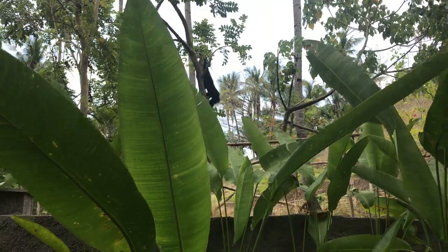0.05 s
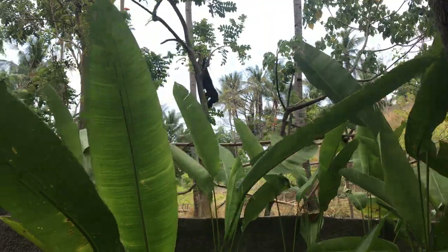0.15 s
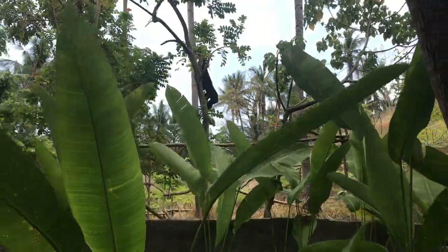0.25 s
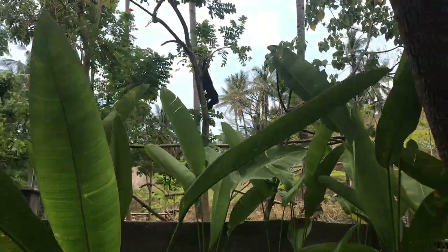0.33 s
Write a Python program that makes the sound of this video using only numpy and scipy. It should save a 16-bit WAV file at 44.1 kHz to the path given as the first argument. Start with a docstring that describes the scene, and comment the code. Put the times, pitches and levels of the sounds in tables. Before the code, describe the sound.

Two gibbons call loudly among trees: one holds a high wavering note while another sweeps upward, then eleven short whoops follow, growing longer and slower, with bright scattered echo off foliage over very quiet outdoor air.

```python
"""In a leafy park two gibbons call. One holds a high clear note while the other glides up through it;
then the note breaks into short arched whoops that grow longer and slower. The voices are sums of harmonics.
Trunks and foliage, as filtered decaying noise, scatter the calls into a bright wash.
Behind them lie very quiet outdoor air, a faint low hum and soft bumps at the microphone, all of shaped noise."""
import sys
import numpy as np
from scipy import signal
from scipy.fft import rfft, irfft
from scipy.io import wavfile
from scipy.ndimage import uniform_filter1d

SR = 44100
rng = np.random.default_rng(int(sys.argv[2]) if len(sys.argv) > 2 else 0)


def master(y):
    """Save y as 16-bit WAV."""
    cut = np.clip(np.atleast_2d(y).T, -1, 1)
    pcm = np.round(cut * 32767)  # scale
    wavfile.write(sys.argv[1], SR, pcm.astype(np.int16))


N = 132300
T = np.arange(N) / SR  # s
ATTACK_S, RELEASE_S = 0.009, 0.02  # onset and ending of a call


def undb(db):
    """Decibels to gain."""
    return 10 ** (np.asarray(db) / 20)


def curve(table, column=1):
    """One column of a time table at every sample."""
    table = np.array(table)
    return np.interp(T, table[:, 0], table[:, column])


def response(table, hz):
    """Gain of a (Hz, dB) table at given frequencies, read along log frequency."""
    f, db = np.array(table).T
    return undb(np.interp(np.log(np.maximum(hz, 1)), np.log(f), db))


def coloured(x, colour):
    """A sound filtered by a (Hz, dB) table."""
    hz = np.arange(N // 2 + 1) * SR / N
    return irfft(rfft(x) * response(colour, hz), N)


def noise(colour):
    """Coloured noise of rms 1."""
    x = coloured(rng.standard_normal(N), colour)
    return x / x.std()


def wobble(rate):
    """Smooth chance with a spread of 1, averaged twice over 1 / rate seconds."""
    k = max(int(SR / rate), 1)
    x = uniform_filter1d(uniform_filter1d(rng.standard_normal(N), k), k)
    return x / x.std()


def gate(t, start, end, attack, release):
    """Smooth rise after the start and smooth fall centred on the end."""
    rise = np.sin(np.pi / 2 * np.clip((t - start) / attack, 0, 1))
    fall = np.sin(np.pi / 2 * np.clip((end - t) / release + 0.5, 0, 1)) ** 2
    return rise * fall


def turn(hz):
    """Phase of the vocal folds."""
    return 2 * np.pi * np.cumsum(hz) / SR


def partial(phase, k):
    """One sine of rms 1 at k times the voice's pitch."""
    return np.sqrt(2) * np.sin(k * phase)


def outdoor_air():
    """Quiet outdoor air as shaped noise whose level drifts a little."""
    # Each row: frequency in Hz, relative level in dB.
    air_colour = [(20, -26), (60, 4.5), (130, 1.5), (250, 0.5), (315, -3), (400, -12), (700, -13),
                  (1500, 2.5), (3000, -10.5), (7000, -12), (15000, -24)]
    level_db = -57.5 + 0.79 * wobble(10.4)
    return undb(level_db) * noise(air_colour)


def low_hum():
    """A faint low hum under the held note: a narrow band of noise that fades away."""
    # Each row: time in seconds, level in dB.
    hum_level = [(.1, -54.5), (.5, -63), (.85, -65), (1.1, -67)]
    # Each row: frequency in Hz, relative level in dB.
    hum_colour = [(150, -71), (260, -19), (300, 4), (335, 5), (400, -36), (700, -65)]
    return undb(curve(hum_level)) * noise(hum_colour)


def held_note(count=18):
    """A clear, almost level note falters and ends in a short swelling fall; returns low and high harmonics."""
    # The held pitch. Each row: time in seconds, pitch in Hz.
    hold_pitch = [(.09, 857), (.155, 863), (.18, 853.2), (.23, 854.4), (.31, 867.6), (.37, 852),
                  (.45, 879.5), (.5, 853), (.54, 845.3), (.6, 859.3), (.635, 829), (.67, 864.5),
                  (.695, 838.3), (.725, 803), (.752, 821), (.778, 835), (.802, 715)]
    # The lowest harmonics fade in and out. Each row: time in seconds, first, second and third harmonic in dB.
    hold_level = [(.09, -30.5, -29, -36.5), (.2, -21, -24.5, -28.5), (.235, -25, -28, -72),
                  (.26, -28, -42, -48), (.285, -28, -26.5, -29), (.38, -27.5, -28.5, -53),
                  (.43, -29.5, -48, -62), (.475, -28, -24, -30), (.52, -22.5, -22, -77),
                  (.545, -25, -33, -38), (.595, -22, -25, -25.5), (.628, -36.5, -28, -54),
                  (.66, -25.5, -21.5, -30.5), (.695, -27, -24, -35), (.712, -34.5, -36, -36),
                  (.74, -35, -33.5, -44.5), (.776, -21.5, -19, -34.5), (.8, -27, -23.5, -34)]
    # The upper harmonics. Each row: frequency in Hz, level in dB.
    hold_treble = [(3430, -62.5), (4300, -50), (5150, -53.5), (6000, -55), (6900, -59.5), (7750, -65.5),
                   (8600, -60.5), (10300, -72.5), (12900, -68), (15500, -76)]
    hz = curve(hold_pitch) * (1 + 0.0031 * wobble(200))  # slight pitch jitter
    phase = turn(hz)
    low = sum(undb(curve(hold_level, k)) * partial(phase, k) for k in range(1, 4))
    high = sum(response(hold_treble, k * hz) * partial(phase, k) for k in range(4, count + 1))
    low_gate = gate(T, 0, hold_pitch[-1][0], ATTACK_S, RELEASE_S)
    high_gate = gate(T, 0, 0.839, ATTACK_S, 0.016)  # the treble ends slightly later
    return low * low_gate, high * high_gate


def foliage(x):
    """Uneven scatter from near trees, then a soft echo and faint tail from far ones; treble dies sooner."""
    # Strength of the scattered sound. Each row: frequency in Hz, level in dB.
    scatter_colour = [(300, -21), (620, -10), (800, -8.5), (1200, -1), (1600, -3.5), (2400, -3),
                      (3500, 7.5), (8000, 6.5), (15000, 8.5)]
    BUILD_S, GRAIN = 0.0091, 0.68  # build-up of the scatter; unevenness of the reflections
    NEAR_T60_S, FAR_T60_S, FAR_DB = 0.38, 2.05, -21  # 60 dB decay times in the limit of low pitch
    ECHO_S, ECHO_WIDTH_S, ECHO_DB = 0.316, 0.062, -30.5  # a far line of trees, before the air dulls it
    AIR_HZ = 15100  # scale of the treble loss
    reflections = rng.standard_normal(N) * np.exp(GRAIN * rng.standard_normal(N))
    spectrum = rfft(coloured(reflections / reflections.std(), scatter_colour))
    hz = np.arange(N // 2 + 1) * SR / N
    centres = np.geomspace(250, 16000, 7)  # overlapping bands, each with its own decay
    response_to_click = 0
    for centre, pick in zip(centres, np.eye(len(centres))):
        band = irfft(spectrum * np.interp(hz, centres, pick), N)
        fade = np.log(1000) * T * (1 + centre / AIR_HZ / 2)
        near = np.exp(-fade / NEAR_T60_S)
        tail = undb(FAR_DB) * np.exp(-fade / FAR_T60_S)
        echo = undb(ECHO_DB) * np.exp(-((T - ECHO_S) / ECHO_WIDTH_S) ** 2 - 2 * centre / AIR_HZ)
        shape = (1 - np.exp(-(T / BUILD_S) ** 2)) * (near + tail + echo)
        response_to_click = response_to_click + band * shape / np.sqrt(np.sum(shape ** 2))
    return signal.fftconvolve(x, response_to_click)[:N]


def glide(count=4):
    """A nearly pure tone rises, almost levels off, then sweeps up steeply; it brightens as it gets louder."""
    # The upward path. Each row: time in seconds, guide pitch in Hz, level in dB.
    glide_path = [(.125, 575.7, -45), (.15, 646, -38), (.185, 687, -32.5), (.3, 719, -29),
                  (.358, 764.7, -30), (.405, 856, -22.5), (.458, 946, -25), (.505, 1018, -18.5),
                  (.532, 1210, -21), (.552, 1544, -28)]
    # Each row: harmonic number, level in dB at the loudest moment.
    glide_harmonics = [(1, 0), (2, -13.5), (3, -26), (4, -35)]
    BRIGHTEN = 0.98  # overtones gain this many dB more per dB of level
    phase = turn(curve(glide_path) * (1 + 0.0057 * wobble(200)))  # slight pitch jitter
    db = curve(glide_path, 2)
    overtones = sum(response(glide_harmonics, k) * partial(phase, k) for k in range(2, count + 1))
    fundamental = partial(phase, 0.99)  # 1 % below the guide pitch
    voice = fundamental + undb(BRIGHTEN * (db - db.max())) * overtones
    return voice * undb(db) * gate(T, glide_path[0][0], glide_path[-1][0], 0.024, 0.019)


def whoops(count=24):
    """Whoops arch in pitch, swell and collapse, with rough overtones; returns straight and tree-bound sound."""
    # Each row: start in seconds, length in seconds, time to the top in seconds, top guide pitch in Hz,
    # time from the top to half the fall in seconds, level in dB,
    # then gain of the second and of the upper harmonics on the straight path, both in dB.
    whoop_list = [(0.845, 0.067, 0.019, 799.6, .05, -16.5, 5.5, 2.5),
                  (0.988, 0.065, 0.023, 775, .045, -14.5, 7.5, 4),
                  (1.134, .07, 0.019, 773, .045, -13.5, 2.5, 2), (1.3, 0.085, 0.02, 787, 0.05, -13, 0.5, 0),
                  (1.465, 0.089, .025, 773.3, 0.049, -12.5, -4.5, -5),
                  (1.632, 0.091, .023, 782.4, 0.049, -12, -5, -5),
                  (1.812, 0.091, 0.024, 792, .044, -11.5, -7, -10.5),
                  (1.999, 0.1, .027, 777.6, 0.05, -13, -1, -8),
                  (2.197, 0.1, 0.028, 777.3, 0.05, -13, 0.5, -2.5),
                  (2.399, 0.099, .021, 787, 0.046, -12.5, 0, -3.5),
                  (2.602, 0.11, 0.025, 793.5, 0.046, -11.5, -3, -2.5)]
    # The fundamental's strength by guide pitch. Each row: frequency in Hz, level in dB.
    chest_colour = [(310, -24.5), (390, -20), (450, -20), (540, -7), (620, 0.5), (700, -3), (790, -4)]
    # Strength of the overtones. Each row: frequency in Hz, level in dB.
    throat_colour = [(700, -118), (1000, -24), (1250, -9.5), (1480, -9), (1600, -6), (1800, -22.5),
                     (2350, -18), (2650, -24.5), (3100, -24), (3500, -32.5), (3900, -30.5), (5200, -46.5),
                     (7000, -41.5), (10500, -54), (15000, -58)]
    LOW_HZ, CROAK_HZ = 378.5, 324  # foot of the arch and lowest guide pitch
    DROP_S, DROP_EARLY_S, CROAK_S = 0.04, 0.0029, 0.03  # the pitch collapses into a brief faint croak
    SWELL_S, SWELL_DB, OVERTONE_SWELL_DB = 0.018, -14, -5.5  # each whoop starts weaker
    RUN_OUT_S, RUN_OUT_DB = 0.0132, -11.5  # the voice weakens over its last moments
    JITTER, RASP, DULLING_DB = 0.004, 0.22, -7  # the upper harmonics fade as the voice falls
    TREE_OVERTONE_DB, BRIGHT_SHARE = -0.5, 0.24  # the trees get only a share of the extra brightness
    straight, around = np.zeros(N), np.zeros(N)
    jitter, flutter = wobble(530), wobble(900)
    for start, length, top_s, top_hz, fall_s, db, second_db, upper_db in whoop_list:
        span = (T >= start) & (T < start + length + CROAK_S + RELEASE_S)
        t = T[span] - start
        falling = np.clip((t - top_s) / fall_s, 0, 1)
        arch = LOW_HZ + (top_hz - LOW_HZ) / (1 + ((t - top_s) / fall_s) ** 2)
        collapse = np.exp(-np.maximum(t - length + DROP_EARLY_S, 0) / DROP_S)
        hz = np.maximum(arch * collapse, CROAK_HZ)
        phase = turn(hz * (1 + JITTER * (0.5 + falling) * jitter[span]))  # shakier as it falls
        weak = np.clip(1 - t / SWELL_S, 0, 1)
        spent = np.clip((t - length) / RUN_OUT_S + 1, 0, 1)
        chest = response(chest_colour, hz) * partial(phase, 0.99)  # 1 % below the guide pitch
        chest = chest * undb(db + SWELL_DB * weak + RUN_OUT_DB * spent)
        chest = chest * gate(t, 0, length + CROAK_S, ATTACK_S, RELEASE_S)
        second = response(throat_colour, 2 * hz) * partial(phase, 2)
        upper = sum(response(throat_colour, k * hz) * partial(phase, k) for k in range(3, count + 1))
        upper = upper * undb(DULLING_DB * falling) * (1 + RASP * flutter[span])
        push = undb(db + OVERTONE_SWELL_DB * weak) * gate(t, 0, length, ATTACK_S, RELEASE_S)
        straight[span] += chest + push * (undb(second_db) * second + undb(upper_db) * upper)
        tree_gain = undb(TREE_OVERTONE_DB + BRIGHT_SHARE * second_db)
        around[span] += chest + push * tree_gain * (second + upper)
    return straight, around


def through_leaves(x):
    """A whoop's straight path to the microphone, where the leaves filter it."""
    # Each row: frequency in Hz, gain in dB.
    direct_colour = [(800, -1.5), (1500, -3.5), (2350, -1.5), (3100, -5), (4000, 1.5), (10000, -8)]
    return coloured(x, direct_colour)


def microphone_bumps():
    """Soft low bumps at the microphone: bell-shaped swells of low noise."""
    # Each row: time of the peak in seconds, level in dB.
    bump_list = [(0.912, -58), (1.46, -52.5), (1.594, -47), (2.351, -60)]
    # Each row: frequency in Hz, relative level in dB.
    bump_colour = [(20, -7), (70, 3), (140, 2.5), (300, -22), (1000, -60)]
    WIDTH_S = 0.057
    swells = sum(undb(db) * np.exp(-((T - peak_s) / WIDTH_S) ** 2) for peak_s, db in bump_list)
    return swells * noise(bump_colour)


def scene():
    """Both animals, heard directly and through the trees, over the quiet background."""
    low, high = held_note()
    rise = glide()
    straight, around = whoops()
    # how strongly each call reaches the trees, in dB
    into_trees = undb(-3.5) * low + undb(-1) * high + undb(-6.5) * rise + around
    calls = low + high + rise + through_leaves(straight)
    background = outdoor_air() + low_hum() + microphone_bumps()
    return (calls + foliage(into_trees) + background)[None]


def record(dry):
    """After a short silence the sound cuts in mid-note; a steep low-pass removes the top."""
    START_S, TOP_HZ = 0.084, 15800
    low_pass = signal.ellip(10, 0.2, 80, TOP_HZ, fs=SR, output="sos")
    return signal.sosfilt(low_pass, dry * (T >= START_S))


dry = scene()
out = record(dry)
master(out)
```